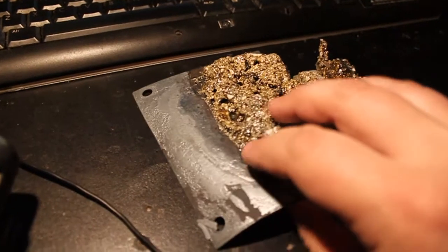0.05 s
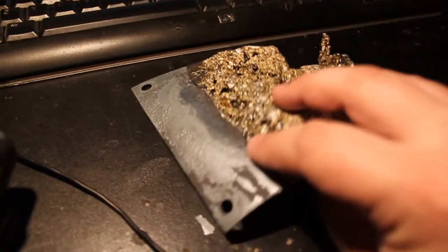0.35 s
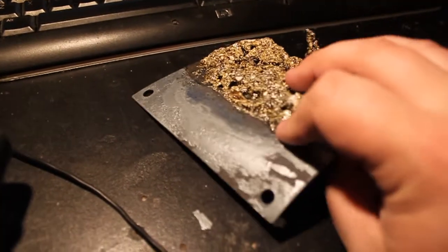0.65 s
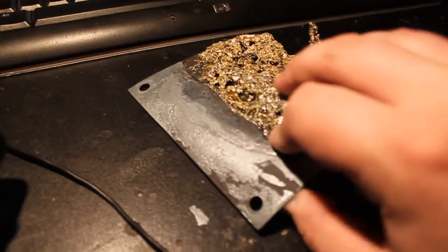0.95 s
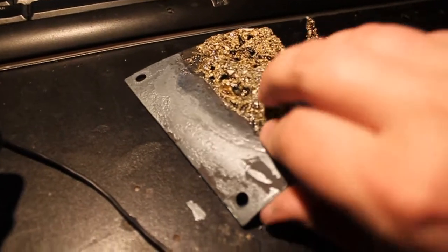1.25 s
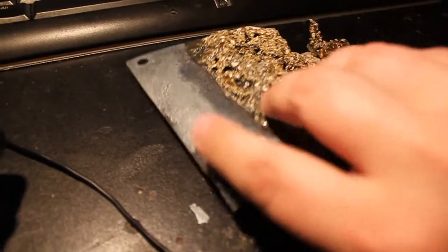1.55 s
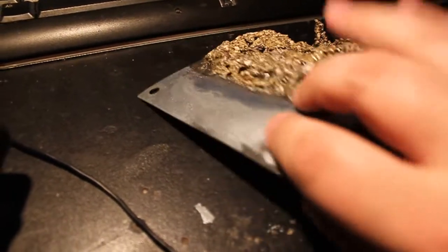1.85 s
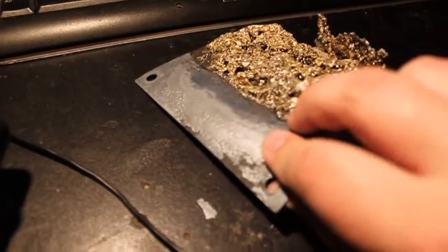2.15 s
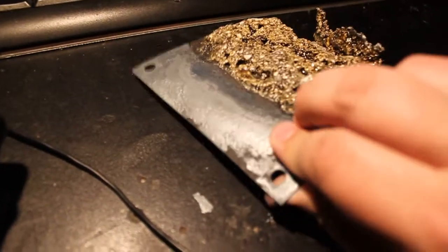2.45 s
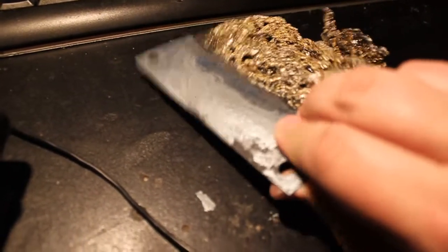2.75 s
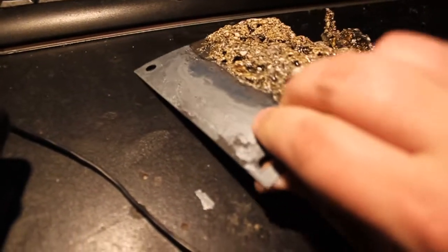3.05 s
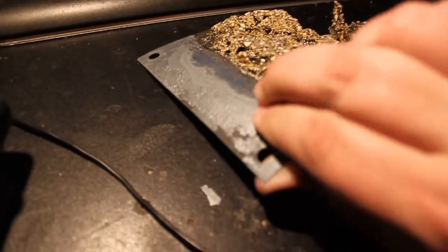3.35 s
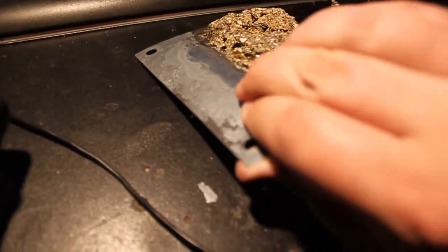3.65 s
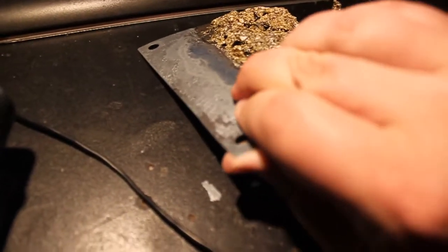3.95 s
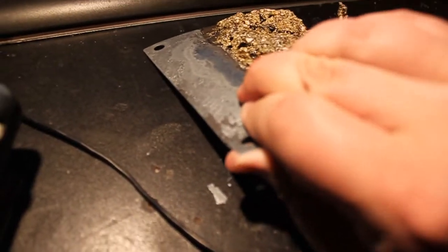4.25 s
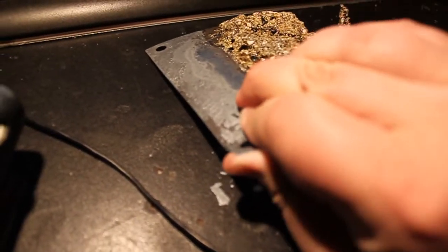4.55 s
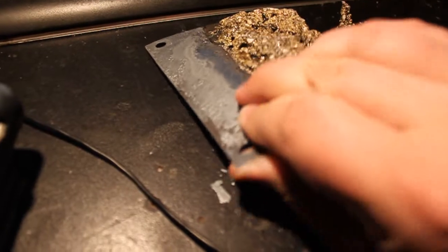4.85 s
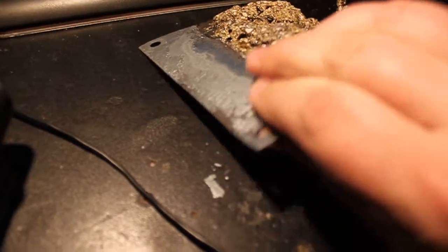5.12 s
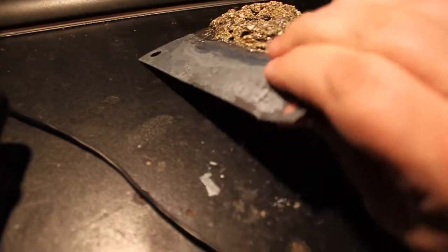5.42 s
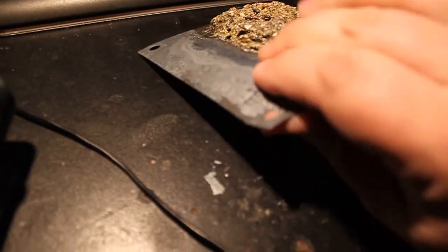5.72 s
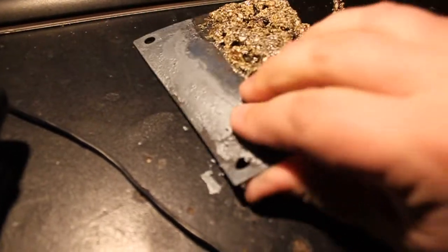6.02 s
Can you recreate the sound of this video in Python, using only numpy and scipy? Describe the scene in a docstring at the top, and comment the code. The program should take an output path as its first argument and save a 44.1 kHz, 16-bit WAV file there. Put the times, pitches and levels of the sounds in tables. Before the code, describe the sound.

A thin metal plate carrying brittle glassy chunks is turned by hand on a desk. It slides in short gritty pushes, rings briefly where its edge taps, and lands with bouncing knocks that make the desk boom. Midway the chunks are squeezed, crackling and crumbling with two sharp snaps. More scrapes and a last ringing knock follow. A close stereo microphone picks up a steady low hum in the small furnished room.

```python
"""A desk in a small furnished room, a stereo microphone close in, a low hum behind everything.
A thin metal plate with brittle glassy chunks on it is turned by hand. It slides in short pushes,
grit hissing and rasping under it, rings where its edge taps, and is set down with a knock and a
bounce that make the desk boom. Squeezed, the chunks crumble, crackle and twice snap sharply."""
import sys
import numpy as np
from scipy import signal
from scipy.fft import rfft, irfft, next_fast_len
from scipy.io import wavfile

SR = 44100
rng = np.random.default_rng(int(sys.argv[2]) if len(sys.argv) > 2 else 0)


def file_out(sig):
    """Save sig as 16-bit WAV at sys.argv[1]."""
    # one column per channel
    cols = np.atleast_2d(sig).T
    # limit, then scale
    lim = np.clip(cols, -1, 1)
    pcm = np.round(lim * 32767).astype(np.int16)
    wavfile.write(sys.argv[1], SR, pcm)


N = 272538
TIME = np.arange(N) / SR

# the plate landing on the desk: t/s, thump/dB, clack/dB, left over right/dB
LANDINGS = [(1.6712, -38, -36, -5), (1.694, -45, -48.5, -16), (2.6852, -33.5, -32, -10.5),
            (2.7079, -38.5, -38, 5), (5.163, -40.5, -37.5, -7.5), (5.183, -48.5, -44.5, -3),
            (6.086, -38, -48.5, -15)]
# spectrum of the plate's dry clack: f/Hz, level/dB
CLACK_SPECTRUM = [(300, -3.5), (680, 1), (900, -5), (1200, -11), (1500, -2), (2600, 7), (3100, -3.5),
                  (4100, 0), (5200, -14), (7200, -12), (9000, -27), (15000, -26)]
# spectrum of the desk's rumble: f/Hz, level/dB
RUMBLE_SPECTRUM = [(50, -9), (130, 5.5), (230, -5.5), (370, 0), (600, -12.5), (850, -20), (1200, -17.5),
                   (3000, -51)]
# spectrum of a glassy edge's tick: f/Hz, level/dB
TICK_SPECTRUM = [(1500, -16), (3000, -6.5), (5000, -0.5), (7200, 1), (9000, 4), (11500, 1), (13700, 4),
                 (16000, -2.5)]
# spectrum of the knock under that tick, the chunk's body with the plate's mode ringing near 1.8 kHz: f/Hz,
# level/dB
BODY_SPECTRUM = [(300, -27), (700, -10.5), (1400, -16.5), (1620, -8), (1780, 2.5), (2050, -7), (2650, -0.5),
                 (3200, -12.5), (4000, -4.5), (6000, -10)]


def from_db(db):
    return 10 ** (np.asarray(db) / 20)


def rms_one(x):
    return x / np.sqrt(np.mean(x ** 2) + 1e-20)


def panned(db):
    """Channel gains that put left db above right."""
    return from_db(np.array([[db], [-db]]) / 2)


def add(out, t, sound):
    """Mix a stereo sound in at t seconds."""
    at = int(np.clip(t * SR, 0, N - 1))
    out[:, at:at + sound.shape[1]] += sound[:, :N - at]


def colour(x, spectrum):
    """Minimum-phase filter shaped to a spectrum, with unit power gain."""
    hz, db = np.transpose(spectrum)
    grid = np.linspace(1, SR / 2, 4097)
    gain = from_db(np.interp(np.log(grid), np.log(hz), db))
    cepstrum = irfft(np.log(gain))
    cepstrum[1:len(grid) - 1] *= 2
    cepstrum[len(grid):] = 0
    response = irfft(np.exp(rfft(cepstrum)))
    return signal.oaconvolve(x, response[None] / np.linalg.norm(response))[:, :x.shape[1]]


def butter(x, order, hz, kind):
    return signal.sosfilt(signal.butter(order, hz, kind, fs=SR, output="sos"), x)


def ring(x, hz, t60):
    """One mode: a unit click sets a sine of height 1 ringing."""
    r, w = from_db(-60 / (t60 * SR)), 2 * np.pi * hz / SR
    return signal.lfilter([0, np.sin(w)], [1, -2 * r * np.cos(w), r * r], x + 1e-18)


def drift(per_s):
    """Random wavering, rms 1."""
    knots = rng.standard_normal(int(N / SR * per_s) + 2)
    return rms_one(np.interp(TIME * per_s, np.arange(len(knots)), knots))


def burst(t60, size=8192):
    """A contact breaking up into tiny impacts: stereo noise that dies away."""
    return rng.standard_normal((2, size)) * from_db(-60 * TIME[:size] / t60)


def struck(modes, vary_db, spread_rad, size=12000):
    """One blow: each mode has its own strength and reaches the two channels out of step."""
    hz, db, t60 = np.transpose(modes)[:, :, None, None]
    gain = from_db(db + vary_db * rng.standard_normal(db.shape))
    phase = np.pi * rng.integers(0, 2, db.shape) + spread_rad * rng.standard_normal((len(modes), 2, 1))
    decay = from_db(-60 * TIME[:size] / t60)
    sound = np.sum(gain * decay * np.sin(2 * np.pi * hz * TIME[:size] + phase), axis=0)
    return sound / np.sqrt(np.sum(gain ** 2)) / 2


def grains(per_s, size_db):
    """Rough spots slipping: random clicks of uneven size, rms 1."""
    sizes = from_db(size_db * np.minimum(rng.exponential(1, N), 4)) * rng.choice([-1, 1], N)
    return rms_one(sizes * (rng.random(N) < per_s / SR))[None]


def gesture(start, rise, length, fade_t60):
    """One movement of the hand: it gathers speed, holds and dies away."""
    t = TIME - start
    speeding_up = np.sin(np.pi / 2 * np.clip(t / rise, 0, 1)) ** 2
    return speeding_up * from_db(-np.clip(60 * (t - length) / fade_t60, 0, 200))


def room_tone(hum_hz=47.34, hum_width_hz=13.8):
    """A wavering low hum over the room's steady rush, centred in the bass and wide in the treble."""
    # the rush of the room: f/Hz, level/dB
    air_spectrum = [(15, -1.5), (24, 14), (31, 3.5), (62, -11), (80, -0.5), (120, -16.5), (200, -12.5),
                    (260, -19), (360, -21.5), (520, -30), (850, -31.5), (3600, -45), (7000, -47.5),
                    (16000, -51)]
    hum_band = hum_hz + hum_width_hz * np.array([-.5, .5])
    wavering = rms_one(butter(rng.standard_normal(N + SR), 2, hum_band, "band")[SR:])
    hum = rms_one(np.sin(2 * np.pi * hum_hz * TIME) + wavering)
    white = rng.standard_normal((3, N))
    centre = butter(white[2], 1, 500, "low")
    wide = butter(white[:2], 1, 500, "high") + 0.41 * white[:2]
    return from_db(-50) * hum + from_db(-52.5) * rms_one(colour(centre + wide, air_spectrum))


def room_tail(x, t60, wet_db):
    """The furnished room returns a short diffuse tail, faint this close to the desk."""
    # the reverberation: f/Hz, level/dB
    tail_spectrum = [(60, 7), (200, 6), (600, 8.5), (2500, -3), (6000, -4.5), (16000, -3.5)]
    build_up = np.minimum(TIME[:22050] / .008, 1)
    tail = colour(burst(t60, size=22050) * build_up, tail_spectrum)
    tail /= np.linalg.norm(tail, axis=1, keepdims=True)
    return from_db(wet_db) * signal.oaconvolve(x, tail, axes=1)[:, :N]


def hand_drag(strength):
    """The heel of the hand rumbles through the desk with every push."""
    drag = rng.standard_normal(N) + 0.58 * rng.standard_normal((2, N))
    return strength * from_db(-5) * rms_one(colour(drag, RUMBLE_SPECTRUM)) * panned(-2.5)


def desk_bumps():
    """Dull bumps on the desk, alone or under the plate's hard knocks: a hollow knock and a deep thud."""
    # desk bumps: t/s, hollow knock/dB, thud/dB
    bumps = [(0.031, -46.5, -37.5), (0.301, -66, -38.5), (0.366, -63, -35), (0.38, -55, -38),
             (0.415, -62, -49), (0.466, -56, -37.5), (0.549, -51, -50), (0.692, -49, -60),
             (0.736, -42.5, -44), (0.819, -45, -39), (1.288, -47, -45), (2.283, -45.5, -41.5),
             (2.395, -53, -52), (2.643, -53.5, -28.5), (2.686, -39, -40), (3.544, -49.5, -64),
             (3.69, -53.5, -50), (3.822, -55.5, -71), (6.086, -33, -50)]
    # the desk's hollow knock: f/Hz, level/dB
    hollow_spectrum = [(150, -17.5), (350, 1), (500, -7), (660, -1.5), (850, -9), (1200, -12.5),
                       (4000, -29.5)]
    # the desk's deep thud: f/Hz, level/dB
    thud_spectrum = [(30, -20), (70, -9), (125, 2), (200, -16), (400, -15), (1200, -52)]
    hollow, thud = np.zeros((2, 2, N))
    for t, hollow_db, thud_db in bumps:
        mid, side = burst(t60=0.088)
        add(hollow, t, from_db(hollow_db - 1) * (mid + 0.33 * side * [[1], [-1]]))
        add(thud, t, from_db(thud_db + 0.5) * burst(t60=0.026)[:1] * panned(-6))
    return colour(hollow, hollow_spectrum) + colour(thud, thud_spectrum)


def desk_boom():
    """After the plate lands the desk shudders and its low modes ring on."""
    # low modes of the desk: f/Hz, level/dB, t60/s
    low_modes = [(126.3, -0.5, 0.24), (215, -11.5, 0.17), (258.5, -10.5, 0.57), (329, -15.5, 0.32),
                 (366, -9, 0.19), (437, -11, 0.16)]
    boom, shudder = np.zeros((2, 2, N))
    for t, thump_db, _, _ in LANDINGS:
        add(boom, t, from_db(thump_db - 0.5) * struck(low_modes, vary_db=3, spread_rad=.4, size=20000))
        mid, side = burst(t60=0.13, size=20000)
        add(shudder, t, from_db(thump_db - 12.5) * (mid + 0.12 * side * [[1], [-1]]))
    return boom + colour(shudder, RUMBLE_SPECTRUM)


def edge_squeaks():
    """A dry edge sticks and slips very fast on the plate: a thin, unsteady whistle."""
    # squeaks: t/s, length/s, f/Hz, level/dB
    squeaks = [(0.04, 0.037, 8500, -60.5), (0.343, 0.017, 12000, -62), (0.385, 0.054, 12400, -64)]
    out = np.zeros((2, N))
    for t, length, hz, db in squeaks:
        swell = np.sin(np.pi * np.minimum(TIME[:8192] / length, 1))
        pitch = hz * (1 + 0.0063 * drift(per_s=340)[:8192])
        whistle = np.sin(2 * np.pi * np.cumsum(pitch) / SR)
        add(out, t, from_db(db + 1.5) * swell * whistle * panned(-1))
    return out


def hand_pushes(rise_share=0.48):
    """Strength of hiss, rasp, ring and rumble: each push drives all four with one envelope."""
    # pushes on the plate: t/s, length/s, fade t60/s, hiss/dB, rasp/dB, ring/dB, rumble/dB
    strokes = [(0.032, 0.029, 0.097, -55, -53, -48.5, -52), (0.154, 0.052, 0.69, -65.5, -71, -65, -57.5),
               (0.297, 0.16, 0.76, -67, -75, -63.5, -53.5), (0.576, 0.079, 0.069, -51, -59, -56, -59),
               (0.678, 0.04, .3, -55.5, -56, -50.5, -51.5), (0.715, .1, 0.59, -41.5, -47, -49, -50),
               (1.07, 0.1, 0.059, -59, -58, -53, -49.5), (1.32, 0.081, 0.22, -58, -60.5, -61.5, -53.5),
               (1.462, 0.044, 1, -57.5, -61, -62, -57.5), (1.61, 0.17, 0.29, -55, -57, -60, -58.5),
               (1.811, 0.081, 0.16, -41.5, -52.5, -53, -54.5), (1.961, 0.054, 0.6, -57, -57, -58, -62),
               (2.097, 0.44, 0.45, -66.5, -72, -75, -64), (2.35, 0.047, 0.076, -61, -57.5, -69, -55),
               (2.622, 0.048, 0.79, -60, -57, -66, -50), (2.96, .13, 0.29, -55.5, -58.5, -63, -58.5),
               (3.387, 0.63, 1, -59, -65, -78, -71), (4.619, 0.032, .25, -60, -64, -81, -70),
               (4.72, 0.16, .3, -63, -66.5, -69, -76), (4.884, 0.052, 0.057, -53, -56.5, -63, -56),
               (4.98, 0.095, 0.33, -54, -60.5, -66, -73), (5.16, 0.11, .25, -61, -70, -79, -66),
               (5.565, .03, 0.078, -60, -69, -74, -52), (5.657, .14, 0.71, -54, -58.5, -66.5, -58),
               (5.994, 0.089, 0.67, -47, -52, -51, -50)]
    motion = np.array([gesture(t, rise_share * length, length, fade) for t, length, fade, *_ in strokes])
    gains = from_db(np.array(strokes)[:, 3:]).T
    idle = from_db([[-67.5], [-72], [-74.5], [-61]])  # the held plate never lies quite still
    return np.sqrt(gains ** 2 @ motion ** 2 + idle ** 2)


def moving_contact(x, depth_db, per_s, bands=16):
    """The moving contact favours different parts of the spectrum from moment to moment."""
    size = next_fast_len(N, True)
    hz = np.arange(size // 2 + 1) * SR / size
    band_position = np.interp(np.sqrt(hz), np.sqrt([1000, 16000]), [0, bands - 1])
    spectrum = rfft(x, size)
    out = 0
    for k in range(bands):
        band = irfft(spectrum * np.maximum(1 - abs(band_position - k), 0), size)[:, :N]
        out = out + band * from_db(depth_db * drift(per_s))
    return out


def turning_paths(x, per_s=6, count=6):
    """Dense resonances reach each side of the microphone by paths that change as the plate turns."""
    weights = np.array([drift(per_s) for _ in range(count)])
    out = 0
    for weight in weights / np.linalg.norm(weights, axis=0):
        paths = burst(t60=.028, size=2048)
        paths /= np.linalg.norm(paths, axis=1, keepdims=True)
        out = out + weight * signal.oaconvolve(x, paths)[:, :N]
    return out


def plate_modes(centre_hz, octave_db):
    """A contact spot excites the modes around one pitch best; the others fall off per octave."""
    # modes of the thin plate: f/Hz, level/dB, t60/s
    modes = [(671, 3, 0.073), (1102, -0.5, 0.13), (1423, -7, 0.075), (1551, -4, 0.035), (1767, -3.5, 0.059),
             (2037, -7.5, 0.17), (2288, -7, 0.13), (2620, -3.5, 0.025), (3142, -5, 0.058),
             (3600, -11, 0.055), (4100, -13.5, 0.031)]
    return [(hz, db - octave_db * abs(np.log2(hz / centre_hz)), t60) for hz, db, t60 in modes]


def plate_slide(hiss_gain, rasp_gain, ring_gain):
    """Grit under the moving plate hisses, rasps and keeps the plate's modes ringing."""
    # the gritty hiss: f/Hz, level/dB
    hiss_spectrum = [(2500, -11.5), (5000, 1), (7400, -0.5), (8800, 3), (10000, -0.5), (13500, 1),
                     (16000, -2.5)]
    # the lower rasp: f/Hz, level/dB
    rasp_spectrum = [(500, -15.5), (1000, -17.5), (1600, -6.5), (2400, -7.5), (3200, 1.5), (4100, 7.5),
                     (4800, 3.5), (6500, -32)]
    contacts = grains(per_s=14000, size_db=2.5)
    friction = turning_paths(moving_contact(contacts, depth_db=2, per_s=10))
    friction *= from_db(2.64 * drift(per_s=110))
    ringing = 0
    for k, (hz, db, t60) in enumerate(plate_modes(centre_hz=1890, octave_db=9.5)):
        drive = contacts * from_db(3.5 * drift(per_s=7.6))  # the contact point wanders
        polarity = [[1], [(-1) ** k]]  # every other mode reaches the two sides in opposite phase
        ringing = ringing + ring(drive, hz, t60) * from_db(db) / np.sqrt(t60) * polarity
    return (from_db(-1) * hiss_gain * rms_one(colour(friction, hiss_spectrum)) * panned(-0.093)
            + rasp_gain * rms_one(colour(friction, rasp_spectrum)) * panned(-2.9)
            + from_db(-3.5) * ring_gain * rms_one(ringing) * panned(-10.5))


def plate_taps():
    """The held plate clicks and rings briefly when its edge touches; each spot has its own modes."""
    # edge taps: t/s, level/dB, centre of the excited modes f/Hz
    taps = [(0.0327, -39, 2480), (0.345, -50, 3860), (0.507, -31, 1340), (0.7339, -25, 1420),
            (1.368, -39.5, 1900), (5.496, -40, 3500), (6.0816, -30.5, 1590), (6.0854, -33, 1790),
            (6.101, -33.5, 1770)]
    tone, click = np.zeros((2, 2, N))
    for t, db, centre_hz in taps:
        ringing = struck(plate_modes(centre_hz, octave_db=48), vary_db=1, spread_rad=0.51)
        contact = butter(burst(t60=0.03, size=12000), 2, [.72 * centre_hz, 1.4 * centre_hz], "band")
        add(tone, t + 0.000886, from_db(db) * (ringing + from_db(-2.5) * contact) * panned(-5))
        add(click, t + 0.000906, from_db(db - 7) * burst(t60=.016) / 2 * panned(-9.5))
    return tone + colour(click, CLACK_SPECTRUM)


def plate_knocks():
    """Each landing pushes the desk top once and sets off a dry clack with a short ring."""
    # the desk top under a hard blow: f/Hz, level/dB, t60/s
    desk_modes = [(1490, -5.5, 0.015), (1824, -6, 0.035), (2035, -7, 0.03), (2460, -8, 0.004),
                  (2670, -6, .018), (2830, -11, 0.013), (3300, -11, 0.0051), (3990, -6, 0.014),
                  (3960, -15.5, .016), (4091, -18.5, .016), (5200, -12.5, .01), (7500, -19, 0.012)]
    # the desk top's thump: f/Hz, level/dB
    thump_spectrum = [(30, -6), (70, 3.5), (135, 5), (250, -9.5), (400, -13.5), (700, -16.5), (1100, -28),
                      (3000, -54)]
    push, clack, ringing = np.zeros((3, 2, N))
    for t, thump_db, clack_db, pan_db in LANDINGS:
        add(push, t + 0.00066, from_db(thump_db + 30.5) * panned(-0.54))
        add(clack, t + .0007, from_db(clack_db + 5) * burst(t60=0.02) * panned(pan_db))
        blow = struck(desk_modes, vary_db=3, spread_rad=0.5)
        add(ringing, t + .0007, from_db(clack_db + 8.5) * blow * panned(pan_db))
    return colour(push, thump_spectrum) + colour(clack, CLACK_SPECTRUM) + ringing


def chunk_crumble(ease_db_per_s=7):
    """Tiny fragments give way at random; each squeeze eases as the loose grit is used up."""
    # fingers squeezing the chunks: t/s, length/s, level/dB
    squeezes = [(2.24, 0.65, -67.5), (2.525, .25, -58), (3.362, 0.26, -57.5), (3.59, 0.2, -54.5),
                (3.854, 0.44, -57), (5.2, .25, -66)]
    strength = 0
    for t, length, db in squeezes:
        eased_db = db - ease_db_per_s * np.clip(TIME - t, 0, length)
        strength = strength + from_db(eased_db) * gesture(t, rise=0.021, length=length, fade_t60=0.22)
    crumbs = signal.oaconvolve(grains(per_s=55, size_db=2.5), burst(t60=.012, size=1024))[:, :N]
    return strength * rms_one(colour(crumbs, TICK_SPECTRUM) + from_db(-7) * colour(crumbs, BODY_SPECTRUM))


def chunk_crackle():
    """Rough glassy edges catch and let go: a bright tick, with a lower knock from the chunk's body that briefly
    sets the plate ringing."""
    # edges catching: t/s, level/dB, body offset/dB
    catches = [(1.2872, -42.5, -30), (2.2626, -41, -26), (2.585, -34.5, -29), (2.611, -44, -26),
               (2.7366, -35.5, -40), (2.7695, -34, -32), (2.871, -49, -37), (3.3737, -47, -32),
               (3.3933, -36, -18.5), (3.493, -45.5, -9), (3.548, -40, -24), (3.674, -45, -27),
               (3.683, -31.5, -26), (3.716, -43.5, -12), (3.732, -39, -21), (3.7428, -31.5, -22),
               (3.8171, -41.5, -6), (3.771, -42, -23), (3.8807, -44, -12), (3.8992, -31.5, -21),
               (3.959, -34, -15), (3.98, -33, -19), (4.0112, -25.5, -20), (4.0256, -34, -36),
               (4.0355, -34, -36), (4.056, -35.5, -22), (4.126, -44, -22), (4.1643, -38.5, -25),
               (4.218, -45.5, -11), (4.2473, -42.5, -25), (4.2972, -48, -11), (4.302, -30, -22),
               (4.3186, -31.5, -21), (4.4116, -32.5, -19.5), (4.438, -42, -15), (4.447, -29.5, -14.5),
               (5.2702, -44.5, -29), (5.3956, -42, -20.5), (5.497, -37.5, -30)]
    tick, body = np.zeros((2, 2, N))
    giving_way = 1 - np.exp(-TIME[:8192] / 0.00029)
    for t, db, body_db in catches:
        add(tick, t + 0.00054, from_db(db + 0.5) * burst(t60=0.017) * giving_way)
        add(body, t + 0.00063, from_db(db + body_db + 10.5) * burst(t60=0.031) * panned(-9))
    return colour(tick, TICK_SPECTRUM) + colour(body, BODY_SPECTRUM)


def chunk_snaps():
    """A glassy edge breaks close to the microphone, left of centre: a sharp crack and a short shiver."""
    # breaks: t/s, level/dB, left over right/dB
    snaps = [(3.4252, -8, 8.5), (3.5218, -4, 5.5)]
    # modes of the breaking chunk: f/Hz, level/dB, t60/s
    chunk_modes = [(5300, -26, 0.009), (7700, -19, 0.0028), (8950, -15.5, 0.0058), (10500, -13.5, 0.0026),
                   (14500, -17.5, 0.0059)]
    crack, shiver = np.zeros((2, 2, N))
    for t, db, pan_db in snaps:
        add(crack, t, from_db(db - 2) * struck(chunk_modes, vary_db=0.5, spread_rad=1) * panned(pan_db))
        add(shiver, t, from_db(db - 22) * burst(t60=0.019))
    return crack + colour(shiver, TICK_SPECTRUM) + from_db(-1) * colour(shiver, BODY_SPECTRUM)


def scene():
    """Plate and chunks close up, with the room's tail and tone behind them."""
    hiss, rasp, ringing, rumble = hand_pushes()
    close = (plate_slide(hiss, rasp, ringing) + edge_squeaks() + hand_drag(rumble)
             + plate_knocks() + desk_boom() + plate_taps() + desk_bumps()
             + chunk_crackle() + chunk_crumble() + chunk_snaps())
    return close + room_tail(close, t60=0.31, wet_db=-13) + room_tone()


def record(dry, cutoff_hz=15900):
    """The microphone signal passes a steep treble cut."""
    return signal.sosfilt(signal.ellip(10, .1, 80, cutoff_hz, fs=SR, output="sos"), dry)


dry = scene()
out = record(dry)
file_out(out)
```